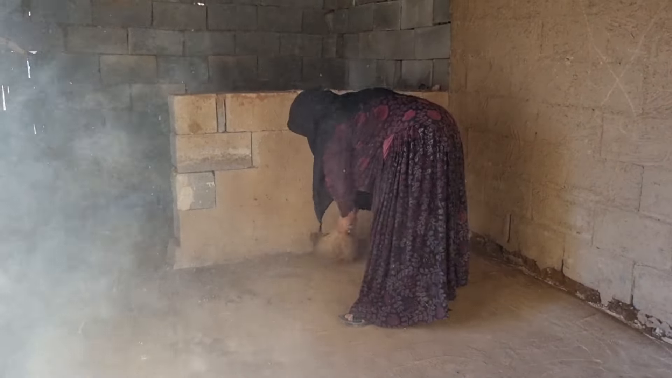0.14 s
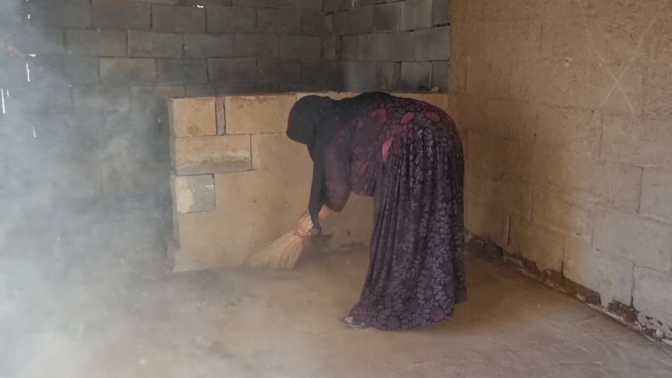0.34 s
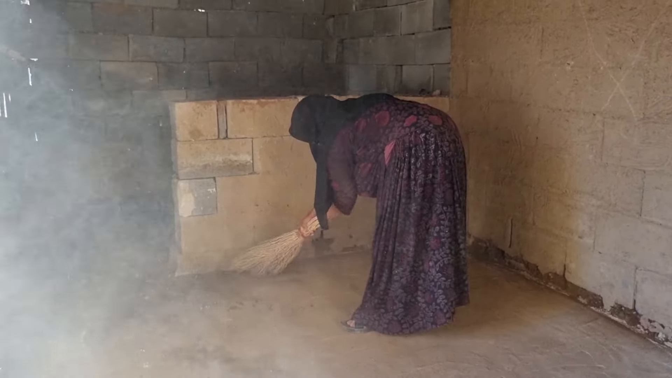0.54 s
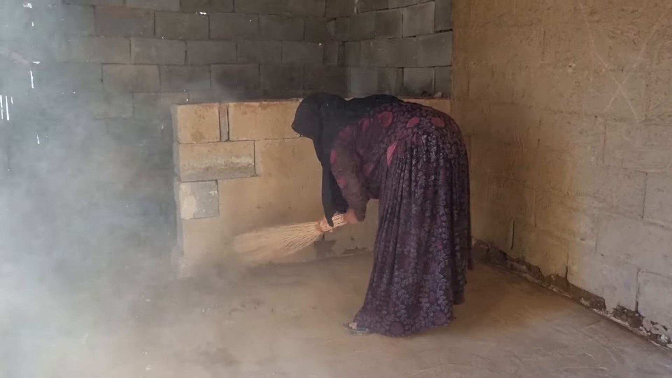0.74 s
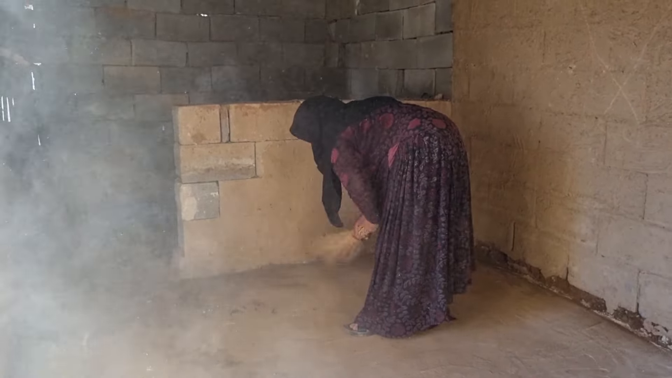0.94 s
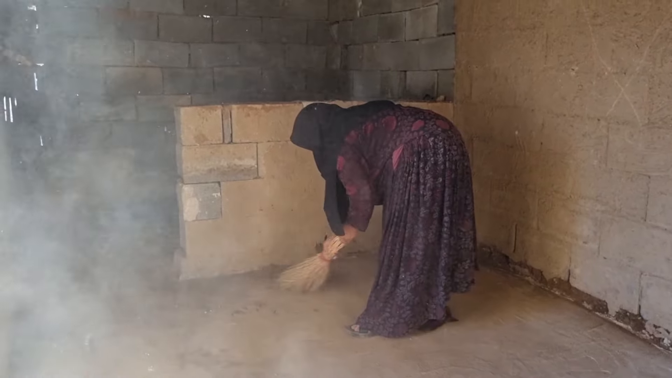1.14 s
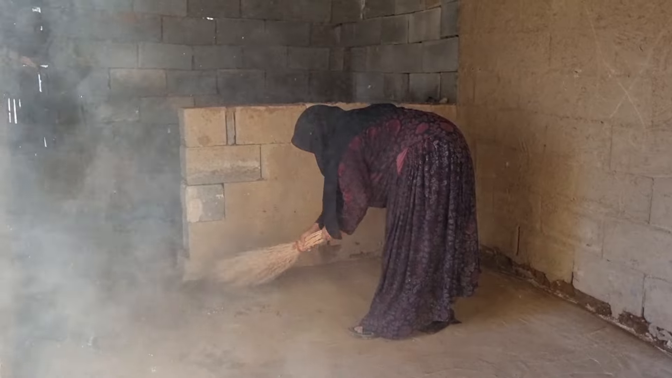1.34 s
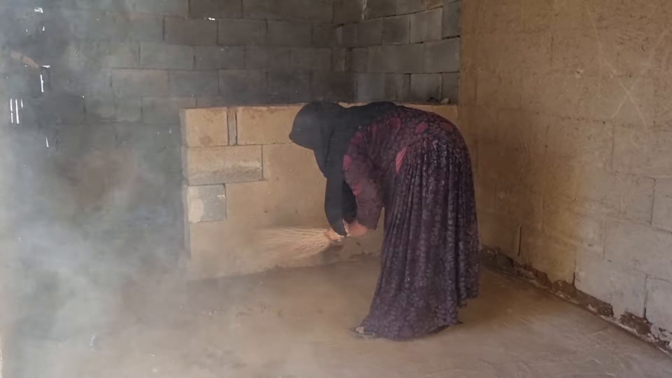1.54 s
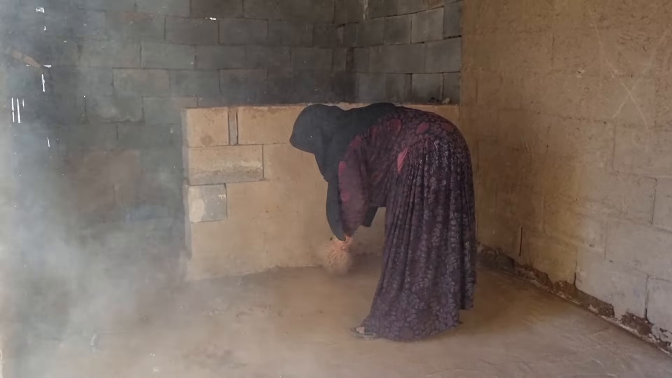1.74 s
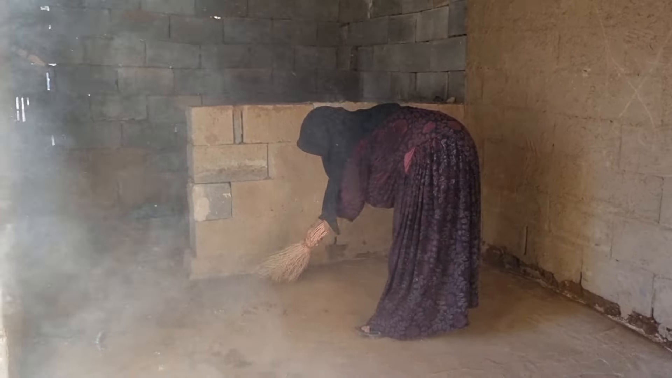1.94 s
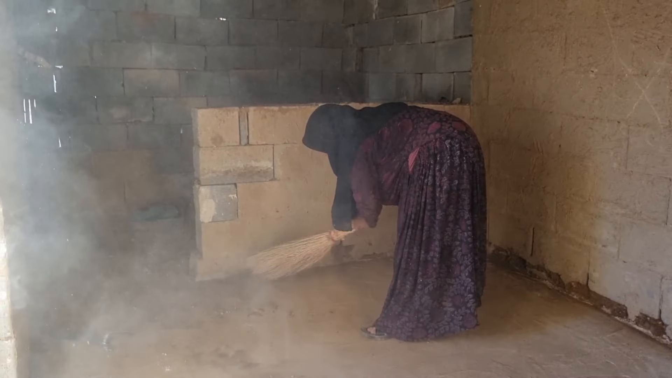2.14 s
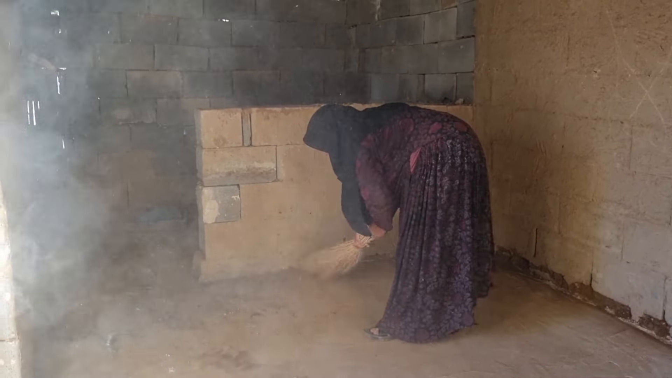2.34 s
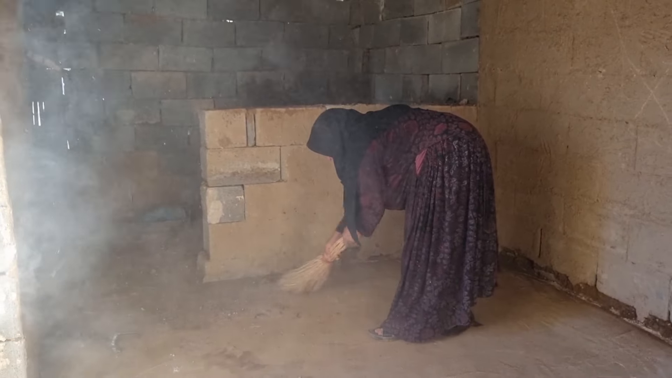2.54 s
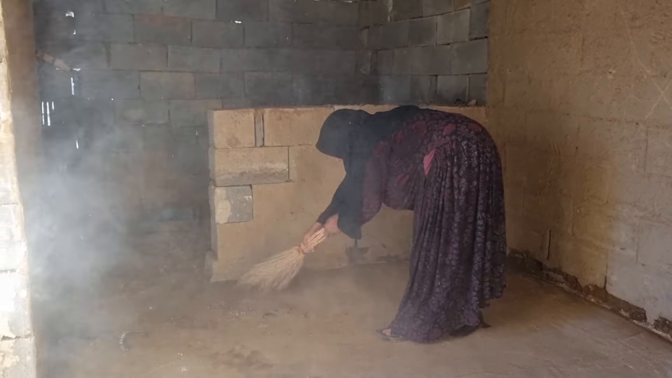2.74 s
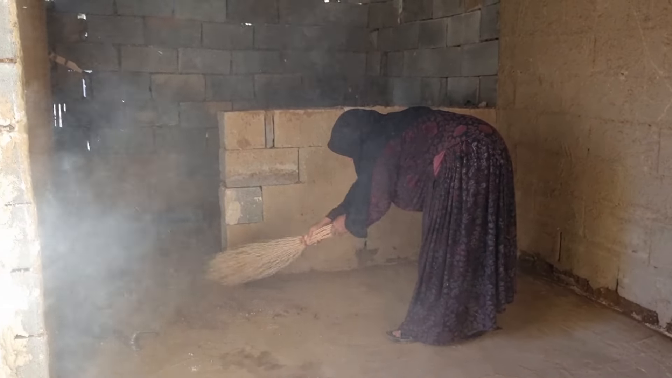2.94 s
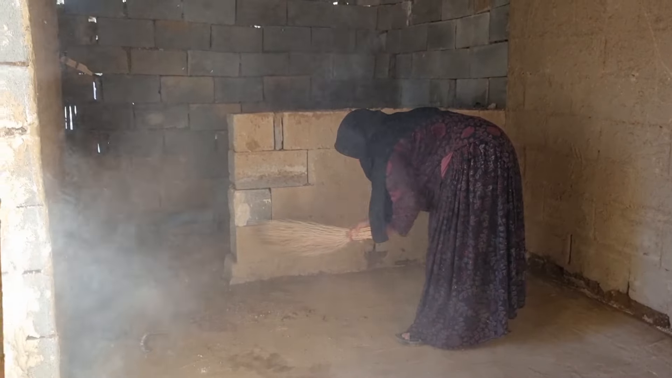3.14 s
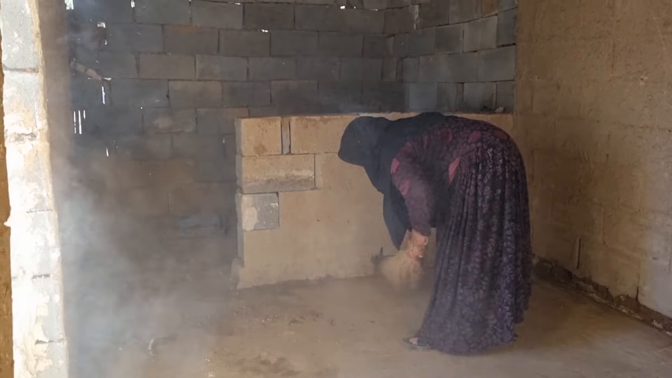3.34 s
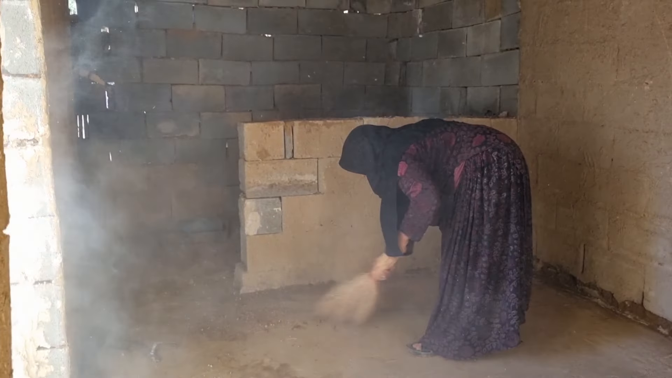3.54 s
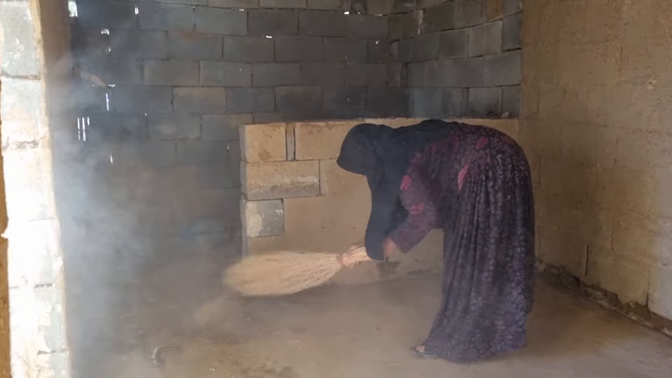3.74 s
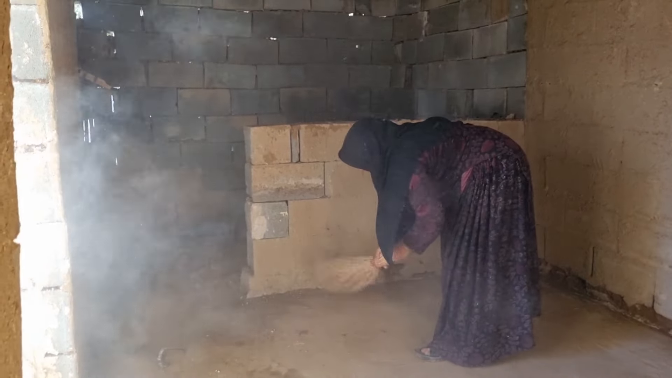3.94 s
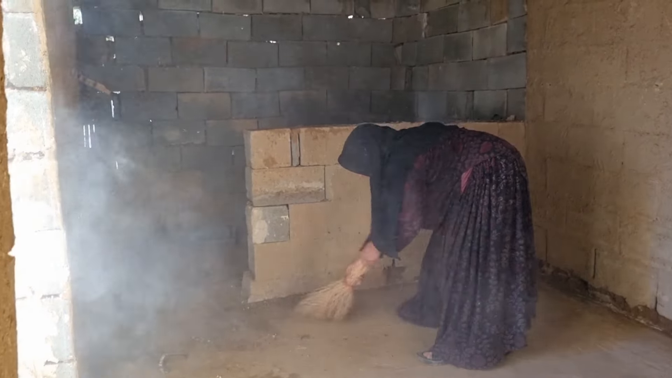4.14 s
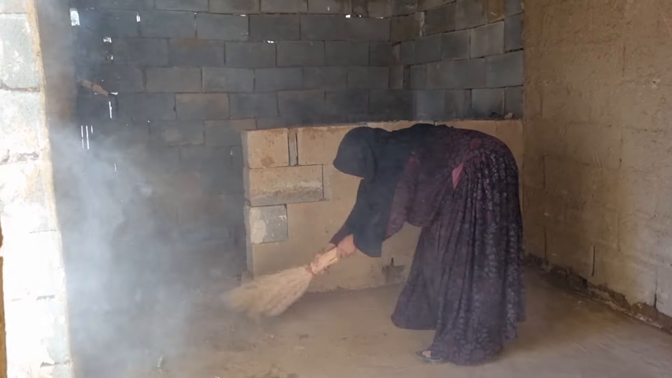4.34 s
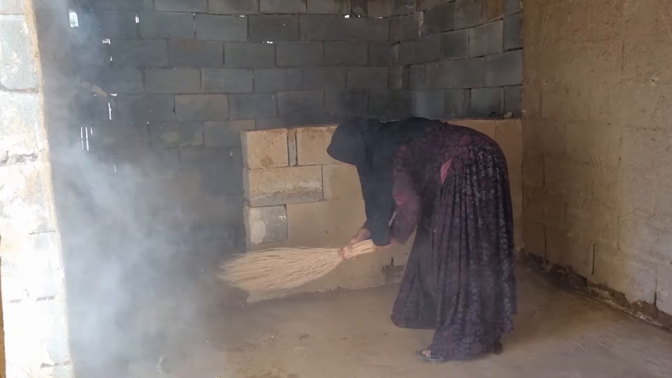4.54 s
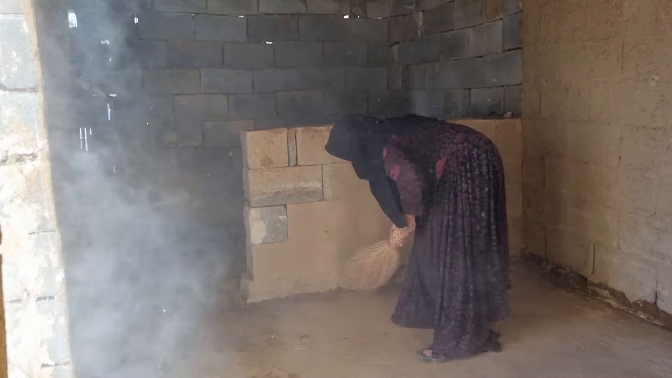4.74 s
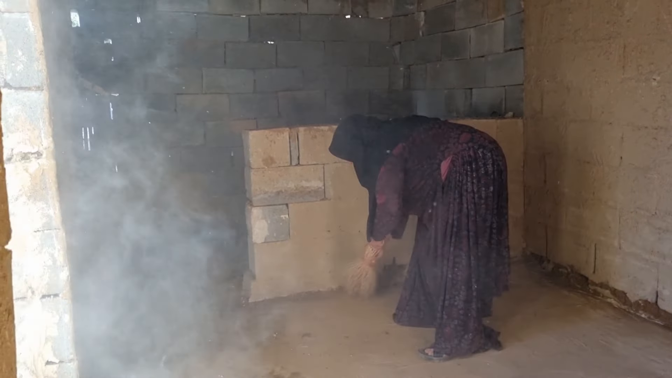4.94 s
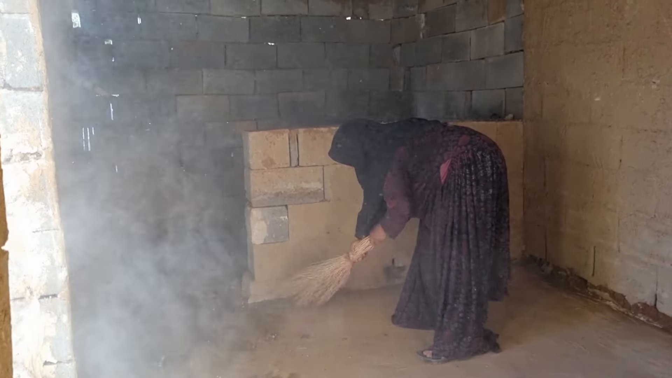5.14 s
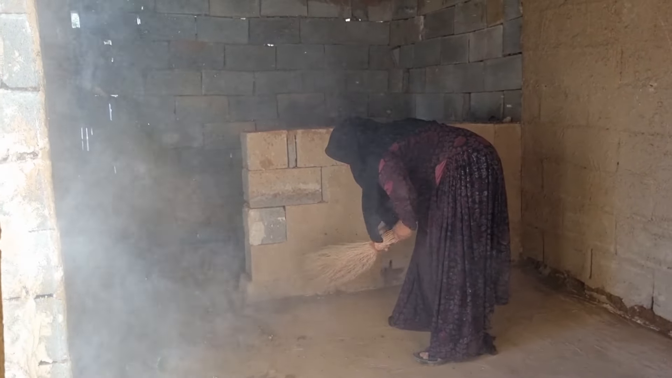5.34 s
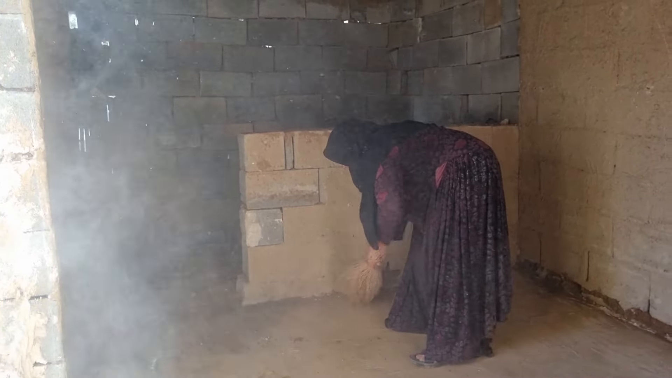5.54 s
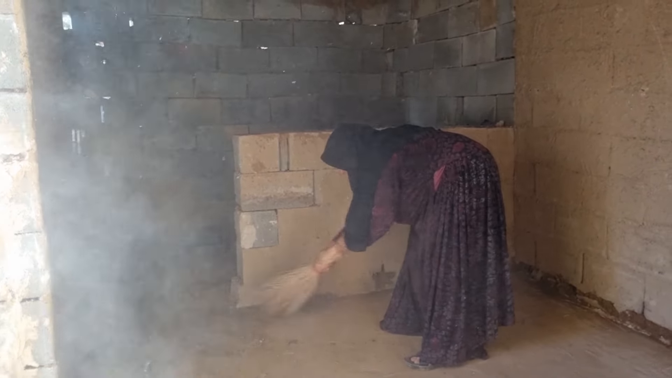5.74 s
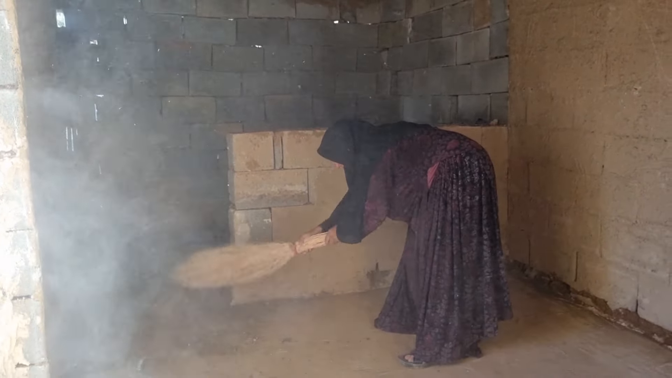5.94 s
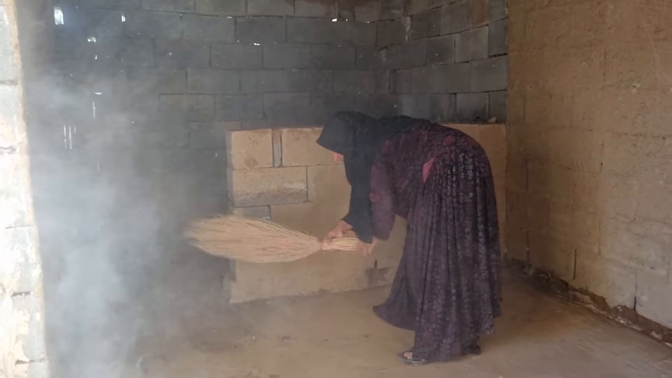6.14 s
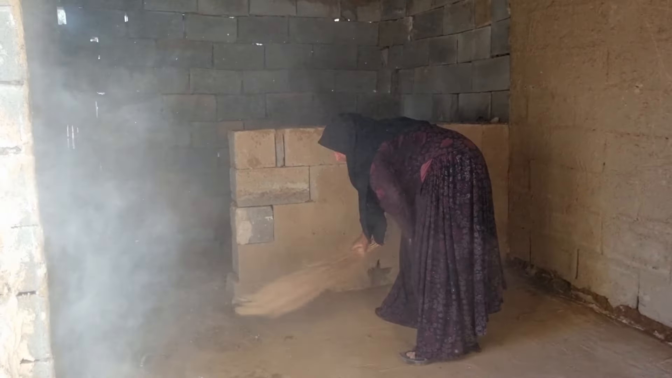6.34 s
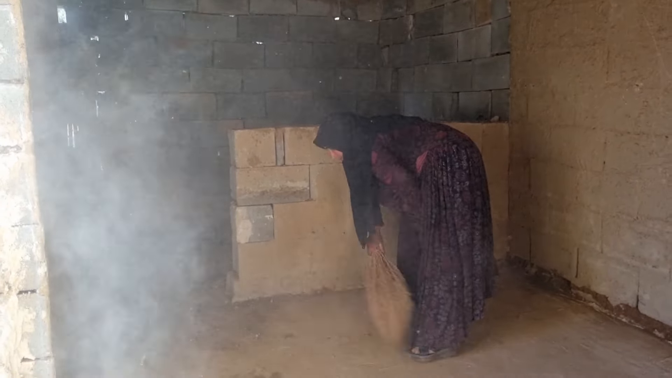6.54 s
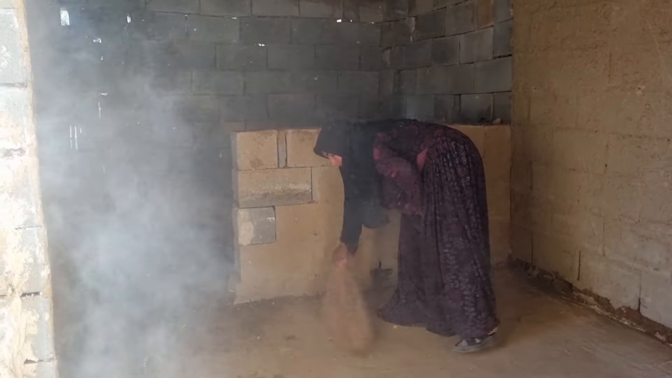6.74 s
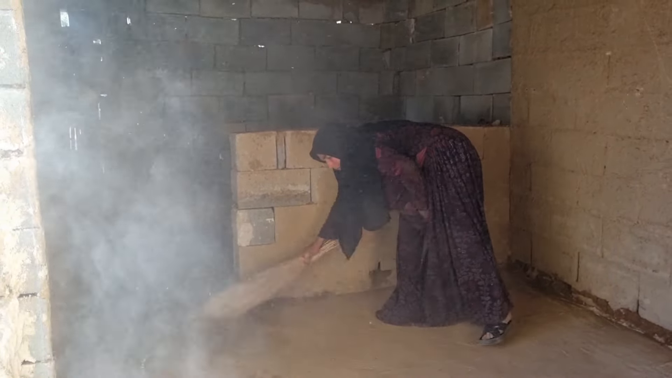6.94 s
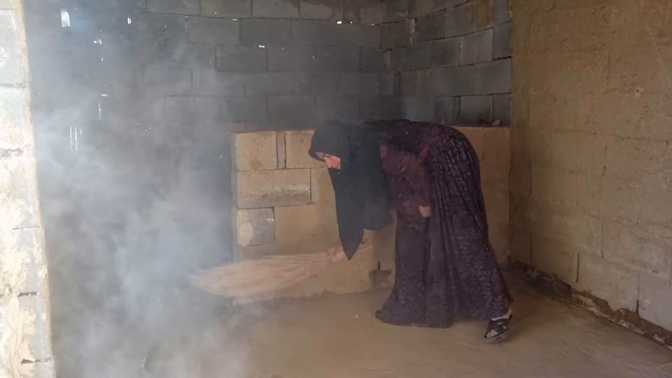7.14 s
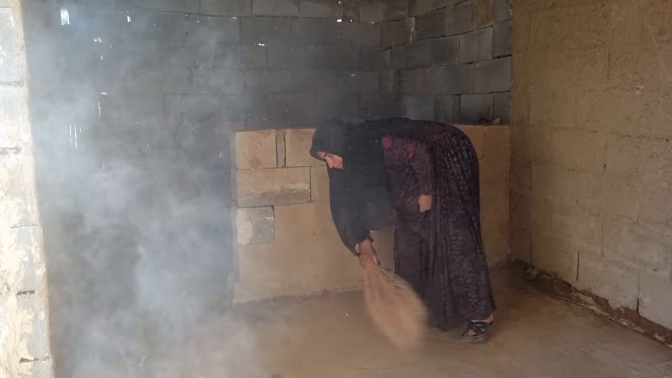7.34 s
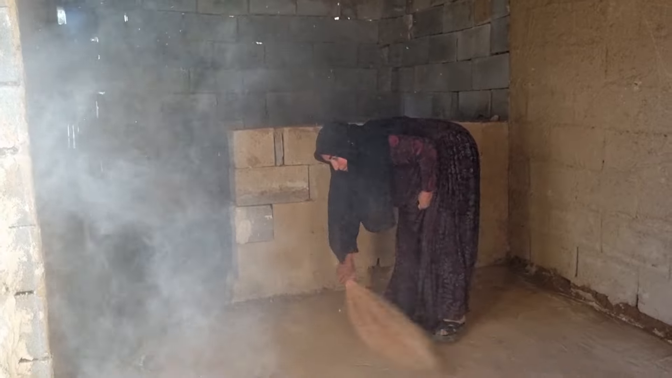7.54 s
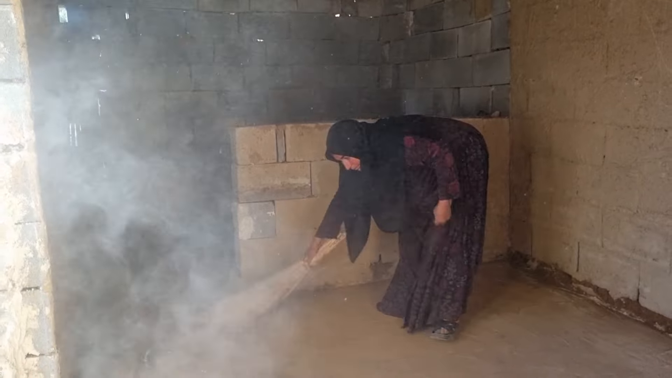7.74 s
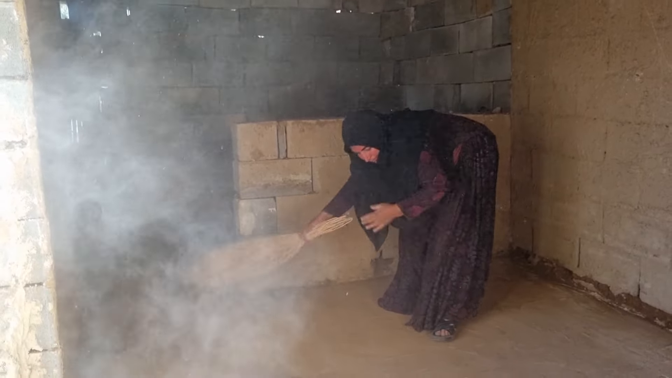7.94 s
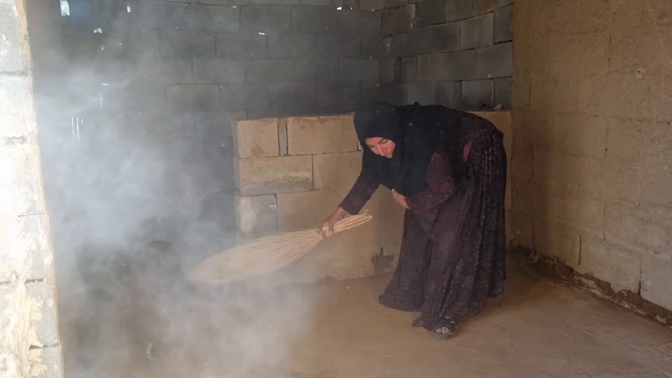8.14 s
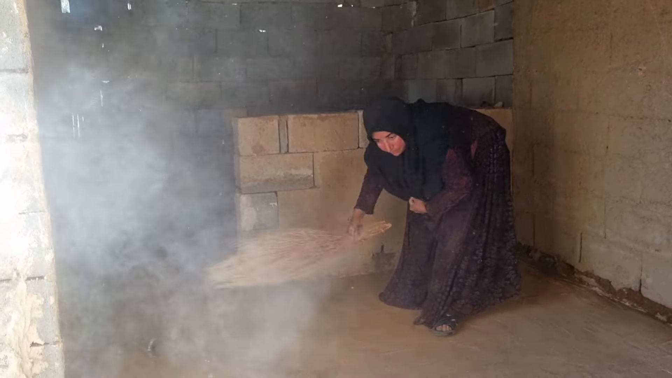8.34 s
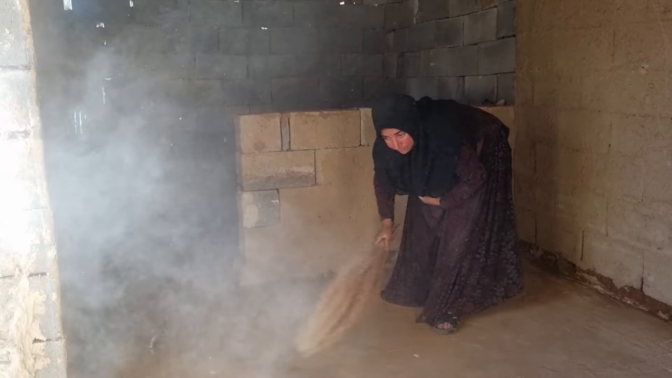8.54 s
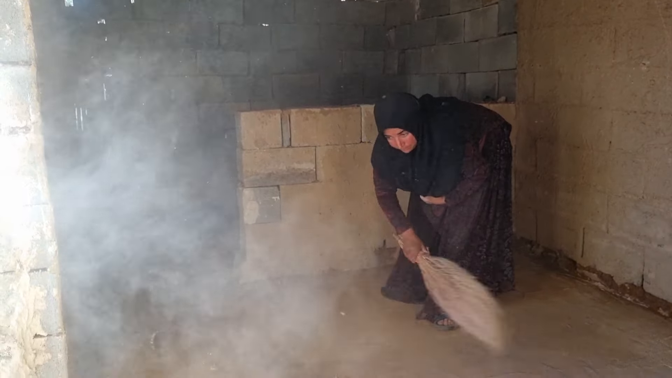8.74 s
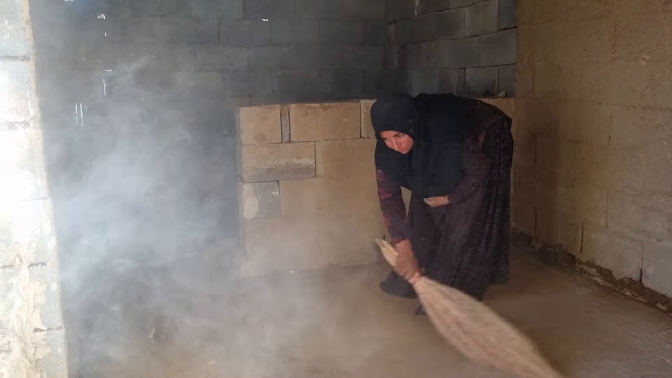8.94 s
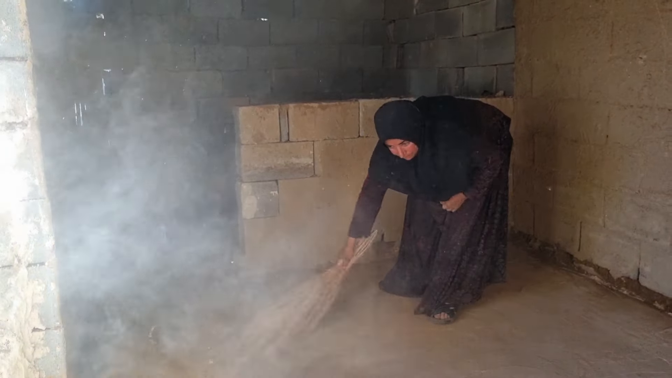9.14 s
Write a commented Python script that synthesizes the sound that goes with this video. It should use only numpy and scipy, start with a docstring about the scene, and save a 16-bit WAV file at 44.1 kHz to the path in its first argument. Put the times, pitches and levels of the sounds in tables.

```python
"""In a bare masonry room, a short straw broom sweeps a dusty floor a few steps away.
Each stroke is a swish of many stalks slipping over grit, often followed by a lighter drag back.
Between strokes the straw rustles and snaps, with soft scuffs, thuds and a brief hollow, breathy rustle.
Something knocks dully once, close by, and a far rooster crows over the low rumble of the room."""
import sys
import numpy as np
from scipy import signal
from scipy.fft import rfft, irfft, next_fast_len
from scipy.io import wavfile

SR = 44100
rng = np.random.default_rng(int(sys.argv[2]) if len(sys.argv) > 2 else 0)


def pcm_store(signal):
    """Save signal as 16-bit PCM."""
    levels = np.round(np.clip(np.atleast_2d(signal), -1, 1) * 32767)
    wavfile.write(sys.argv[1], SR, levels.astype(np.int16).T)


N = 409235

# Levels in dB are relative: each function sets its own loudness on top of them.
# A ring time (t60) is how long a sound takes to fade by 60 dB.

# How alike left and right sound. Each row: frequency in Hz, likeness (capped at 0.99, almost the same).
STEREO_LIKENESS = [(30, 2.6), (100, 0.7), (280, .95), (500, 0.5), (1000, 0), (2000, -0.37), (15000, 0)]
# Which side is louder. Each row: frequency in Hz, left minus right in dB.
STEREO_BALANCE = [(40, 5), (250, 5), (500, 4), (1000, -0.5), (4000, -5), (8000, -4), (13000, -4)]

# The tone of each noise, from bass to treble. Each row: frequency in Hz, level in dB.
RUMBLE_TONE = [(25, -13), (45, -7.5), (65, -2), (95, -1.5), (170, -19.5), (400, -29), (750, -36),
               (1600, -32), (2500, -27.5), (4500, -23), (7500, -21), (9800, -35.5), (15000, -25)]  # the air in the room
SCUFF_TONE = [(250, -2), (400, -7.5), (600, 1), (850, -1.5), (1150, 2), (1700, -10.5), (2800, -3.5)]  # a hollow, breathy hiss
TIP_TONE = [(3500, -16), (5000, -7), (6300, -5), (7500, 1), (8200, -3), (8800, -8.5), (10800, -9.5),
            (12800, -3.5), (15800, -5.5)]  # straw tips hissing
STALK_TONE = [(1200, -32), (1650, -4.5), (2000, -4.5), (2300, -2), (3000, -3), (4300, -2), (5400, -7.5),
              (7000, -13.5)]  # stalks rasping
SCRAPE_TONE = [(200, -25), (380, -8.5), (600, -2.5), (850, -3.5), (1300, 0), (1800, -11), (2800, 1.5)]  # the whole bundle scraping
RUB_TONE = [(55, 6), (90, -2), (130, 8.5), (170, -0.5), (240, 2.5), (320, -1), (400, 0.5), (470, -10),
            (750, -16)]  # a dull rub
RUSTLE_TONE = [(170, 1), (330, -7), (600, -10.5), (850, -11.5), (1500, -7.5), (2400, 0), (3300, -2.5),
               (4500, -1.5), (6000, -6.5), (7700, -5.5), (9200, -22), (11000, -16), (15000, -11.5)]  # loose stalks rubbing each other
TICK_TONE = [(1900, -0.5), (2400, -12.5), (8000, 12.5), (9500, -6), (15800, -2)]  # stalks springing free

# The parts of the rooster's call. Each row: start in seconds, length in seconds, level in dB.
CROW_PARTS = [(1.29, 0.47, -72), (1.63, .17, -68.5), (2.022, .35, -69)]
# A knock and its two rebounds. Each row: start in seconds, level in dB.
KNOCK_HITS = [(3.7658, -15.5), (3.7855, -17.5), (3.7969, -20)]
# The notes of the knocked thing. Each row: pitch in Hz, level in dB, ring time in seconds.
KNOCK_NOTES = [(108, -17, 0.065), (196, -26, 0.12), (265, -21, .19), (301, -4.5, 0.034), (338, -13.5, 0.26),
               (372.6, -6.5, 0.14), (507, -41, 0.1), (581, -25.5, 0.23), (720, -30, 0.11),
               (1070, -19.5, 0.021), (1380, -20, 0.018), (1696, -23.5, 0.043)]
# Broom and feet bumping the floor. Each row: start in seconds, level in dB, pitch in Hz.
FLOOR_THUDS = [(1.145, -31.5, 84.4), (1.157, -47, 150), (3.718, -34, 257), (4.096, -35.5, 203),
               (4.124, -30.5, 79.5), (6.782, -40, 169), (6.86, -48, 95), (7.713, -39.5, 90),
               (7.765, -42, 122), (9.24, -39, 262)]
# Soft scuffs and a brief hollow, breathy rustle.
# Each row: start, rise and fall in seconds, then hiss and rub levels in dB.
SOFT_SCUFFS = [(1.9, 0.051, 0.057, -70, -57), (3.155, 0.018, .11, -61, -54), (4.355, .025, 0.19, -51, -57),
               (7.03, 0.052, 0.46, -69, -62), (7.31, .05, 0.15, -53, -55), (7.65, 0.068, 0.055, -43, -46),
               (7.955, 0.065, 0.21, -57, -67), (9.202, 0.042, 0.11, -48.5, -52)]
# Stalks snapping against the floor. Each row: start in seconds, level in dB, main pitch in Hz,
# level of that pitch in dB, level of the highest treble in dB, ring time in seconds.
STRAW_SNAPS = [(0.1004,-40,7800,10,-10,0.11), (0.979,-36.5,7400,-3,-8,0.27), (1.617,-42,7800,-3,-4,0.14),
               (1.666,-41.5,2120,8,-12,0.07), (3.1632,-41.5,2770,10,-25,0.04), (3.215,-44,3270,21,-25,0.3),
               (3.31,-43,3250,27,-25,0.17), (3.712,-20.5,6000,2.5,-1.5,0.097), (3.809,-31.5,2900,0,-9,0.05),
               (3.8925,-27.5,6060,1,-3,0.092), (4.0223,-30,2306,2,-12,0.099),
               (4.2913,-22.5,2180,-3,-14,0.11), (4.318,-33.5,2330,18,-20,.33), (4.5,-42,2330,17,-22,.1),
               (4.594,-40,5670,-13,-12,0.09), (4.7636,-35.5,2270,10,-27,0.051), (6,-30.5,7250,12,-29,0.055),
               (6.131,-37,2460,6,-16,0.16), (6.146,-36,5770,-2,-11,0.17), (7.704,-20,2230,15,-3,0.025),
               (7.9565,-40.5,6040,-8,-40,0.56), (8.5054,-42.5,7200,-4,-21,0.078),
               (8.8336,-42,7600,8.5,-19,0.062), (9.2385,-20,1840,0,-27,0.097)]
# The notes of the hollow stalks. Each row: pitch in Hz, level in dB, ring time in seconds.
STALK_NOTES = [(1750, -8, 0.016), (2350, 1.5, 0.009), (2660, 6, 0.021), (3230, 3, 0.031), (3900, 3, 0.038),
               (4860, -0.5, 0.051), (5170, -6, 0.018), (5830, -12, 0.015), (7020, 10, 0.0099),
               (7940, -9, 0.012)]
# The rustle as the broom is carried and turned. Each row: time in seconds, level in dB.
RUSTLE_LEVELS = [(0, -82), (.45, -61), (1.58, -66.5), (1.7, -60.5), (3.05, -58), (3.3, -56), (3.8, -46),
                 (3.96, -47.5), (4.42, -51), (4.68, -65), (5.9, -59.5), (6.2, -57), (6.35, -64.5),
                 (6.58, -52.5), (7.16, -62.5), (7.35, -55), (7.9, -62.5), (8.3, -64.5), (8.5, -68.5),
                 (8.68, -79)]
# Tips flicking the floor in passing. Each row: start, rise and fall in seconds, then level in dB.
TIP_FLICKS = [(.01, .015, .15, -64), (.096, .008, .08, -47), (0.969, 0.02, 0.19, -43),
              (2.15, 0.027, 0.1, -43.5), (2.335, 0.028, .08, -44), (3.03, .04, 0.13, -54),
              (3.368, 0.016, 0.17, -47), (3.62, .035, 0.054, -35.5), (4.005, 0.012, 0.18, -45),
              (4.36, .03, 0.16, -42), (4.48, .1, 0.21, -55), (4.665, 0.034, 0.1, -59.5),
              (4.749, 0.01, 0.042, -45.5), (5.97, 0.013, 0.17, -47), (6.29, 0.013, 0.062, -59),
              (6.558, .015, 0.28, -43), (6.655, 0.031, 0.12, -36), (7.07, 0.017, 0.062, -54),
              (7.443, 0.053, 0.18, -38.5), (7.8, .04, .22, -66), (8.1, 0.027, 0.067, -52),
              (8.27, 0.017, .08, -54), (8.435, 0.023, 0.088, -52), (8.495, .015, 0.038, -52)]
# Firm pushes and lighter drags of the broom. Each row: start, rise, hold and fall in seconds,
# then the levels in dB of tip hiss, stalk rasp, bundle scrape and dull rub.
BROOM_STROKES = [ (0.094, 0.091, 0.068, 0.19, -33.5, -42, -53, -63.5),
                 (0.37, 0.31, .03, 0.1, -40, -49.5, -58.5, -68),
                 (1.014, 0.12, 0.035, 0.22, -31, -41, -50.5, -54.5),
                 (1.236, .10, 0.038, 0.18, -41, -57.5, -68, -67.5),
                 (1.741, 0.1, 0.0098, 0.28, -32, -41, -52.5, -67),
                 (1.944, 0.17, 0.034, 0.073, -41, -54, -74, -88),
                 (2.291, 0.087, 0.081, .15, -43, -52.5, -62, -65.5),
                 (2.409, 0.13, 0.017, 0.22, -31.5, -40.5, -51.5, -57),
                 (2.676, 0.24, 0.0091, 0.1, -39.5, -55, -60, -62.5),
                 (3.433, 0.12, 0.024, 0.12, -25.5, -36, -47, -53),
                 (4.05, 0.11, 0.013, 0.18, -30.5, -42, -48, -49.5),
                 (4.235, 0.12, .02, 0.15, -40.5, -45, -62, -54),
                 (4.862, 0.14, 0.085, 0.18, -37, -46, -54.5, -62),
                 (5.077, 0.12, 0.033, 0.09, -38.5, -53, -66, -68),
                 (5.383, 0.056, 0.057, 0.069, -43, -51.5, -63.5, -69),
                 (5.51, 0.2, 0.013, 0.19, -33.5, -42.5, -48, -53.5),
                 (5.728, .10, 0.036, 0.085, -34.5, -48, -70, -61),
                 (6.643, 0.13, 0.064, 0.14, -29, -34.5, -45.5, -46),
                 (7.462, 0.15, .06, 0.19, -28, -36, -47.5, -56),
                 (8.909, 0.13, 0.083, 0.56, -27, -39, -51, -62.5), ]


def from_db(db):
    """Turn decibels into a number to multiply a sound by."""
    return 10 ** (np.asarray(db) / 20)


def together_db(first_db, second_db):
    """The level of two unrelated sounds heard at once."""
    return 20 * np.log10(np.hypot(from_db(first_db), from_db(second_db)))


def rms_one(x):
    """Scale a sound so that its average strength (rms) is 1."""
    return x / np.sqrt(np.mean(x ** 2) + 1e-20)


def at_bins(points, size):
    """Read a frequency table at every frequency of an FFT."""
    hz, value = np.transpose(points)
    return np.interp(np.log(np.fft.rfftfreq(size, 1 / SR) + 1), np.log(hz), value)


def colour(x, tone):
    """Shape a noise with a tone table, at strength 1; beyond the table's ends it drops by 30 dB."""
    size = next_fast_len(N)
    (low, low_db), (high, high_db) = tone[0], tone[-1]
    curve = [(low / 2, low_db - 30), *tone, (high * 2, high_db - 30)]
    shaped = rfft(x, size) * from_db(at_bins(curve, size))
    return rms_one(irfft(shaped, size)[..., :N])


def butter(x, hz, kind, order=2):
    """Keep the lows, the highs or a band of a sound."""
    return signal.sosfilt(signal.butter(order, hz, kind, fs=SR, output="sos"), x + 1e-18)


def drift(rate):
    """A smooth random wander of about 1 either way; a higher rate wanders faster."""
    pole = np.exp(-80 * np.pi * rate / SR)
    noise = rng.standard_normal(N // 40 + 2002)
    slow = signal.lfilter([1], [1, -2 * pole, pole * pole], noise)[2000:]
    return np.interp(np.arange(N) / 40, np.arange(len(slow)), rms_one(slow))


def ring(clicks, hz, t60):
    """Each click starts a pure note that fades away."""
    decay, angle = from_db(-60 / (t60 * SR)), 2 * np.pi * hz / SR
    return signal.lfilter([0, np.sin(angle)], [1, -2 * decay * np.cos(angle), decay ** 2], clicks + 1e-18)


def diffuse(count):
    """Stereo noise arriving from all sides: alike left and right in the bass, unrelated in the treble."""
    size = next_fast_len(count)
    mid, side = rfft(rng.standard_normal((2, size)))
    alike = np.clip(at_bins(STEREO_LIKENESS, size), -.99, .99)
    sign = np.array([[1], [-1]])
    pair = np.sqrt(1 + alike) * mid + sign * np.sqrt(1 - alike) * side
    balance = from_db(sign * at_bins(STEREO_BALANCE, size) / 2)
    return rms_one(irfft(pair * balance, size)[:, :count])


def room(x, echo_db, t60=0.18):
    """The direct sound, then a blur of echoes from the bare walls."""
    t = np.arange(SR // 2) / SR
    tail = diffuse(len(t)) * from_db(-60 * t / t60) * (t > .003)
    tail = rms_one(tail) / np.sqrt(len(t))
    return x + from_db(echo_db) * signal.fftconvolve(x[None], tail, axes=1)[:, :N]


def slips(per_s, spread_db):
    """Random clicks of uneven size, as when stalks catch on grit and let go."""
    sizes = from_db(spread_db * np.minimum(rng.exponential(1, N), 5)) * rng.choice([-1, 1], N)
    return sizes * (rng.random(N) < per_s / SR)


def friction(level_db, tone, per_s, grain_db, flutter_db):
    """Countless slips merge into a hiss; the larger ones stand out as grain and echo in the room."""
    gain = from_db(level_db + flutter_db * drift(29))
    grain = gain * colour(slips(per_s, spread_db=1), tone)
    return gain * colour(diffuse(N), tone) + from_db(grain_db) * room(grain, echo_db=2)


def swell(start, rise, hold, fall, fall_power, rise_power=2.3, depth_db=21.5):
    """The loudness of one stroke or scuff: it grows, holds and dies away."""
    gain = np.zeros(N)
    first = max(int((start - rise - .1) * SR), 0)
    last = min(int((start + rise + hold + 4 * fall) * SR), N)
    t = np.arange(first, last) / SR - start
    early = np.maximum(1 - t / rise, 0)
    late = np.maximum(t - rise - hold, 0) / fall
    drop_db = depth_db * (early ** rise_power + late ** fall_power)
    gain[first:last] = from_db(-np.minimum(drop_db, 120))
    return gain


def room_rumble(level_db=-59.5):
    """The air of the room: a low, steady noise from all around."""
    return from_db(level_db) * colour(diffuse(N), RUMBLE_TONE)


def rooster(top_hz=994, top_s=1.2, sag_hz_per_s=80, waver=0.0235, fading_db=3):
    """Only the strongest tone of the hoarse crow carries this far; it sags and fades in and out."""
    t = np.arange(N) / SR
    hz = top_hz - sag_hz_per_s * (t - top_s)
    phase = 2 * np.pi * np.cumsum(hz * (1 + waver * drift(98))) / SR
    gain = sum(from_db(db) * np.sin(np.pi * np.clip((t - start) / length, 0, 1))
               for start, length, db in CROW_PARTS)
    return room(gain * from_db(fading_db * drift(15)) * np.sin(phase), echo_db=5)


def knock():
    """A blow and two softer, duller rebounds ring the same low notes."""
    blow, *rebounds = [signal.unit_impulse(N, round(start * SR)) * from_db(db) for start, db in KNOCK_HITS]
    clicks = blow + butter(sum(rebounds), 650, "low", order=1)
    body = sum(ring(clicks * from_db(db), hz, t60) for hz, db, t60 in KNOCK_NOTES)
    return room(butter(body, [85, 2500], "band"), echo_db=-13)


def thuds(t60=0.092):
    """Broom and feet land softly and heavily: each bump is a short, low note."""
    bumps = sum(ring(signal.unit_impulse(N, round(start * SR)) * from_db(db), hz, t60)
                for start, db, hz in FLOOR_THUDS)
    return room(butter(bumps, [55, 900], "band"), echo_db=-13)


def scuffs():
    """Soft scuffs and a brief hollow, breathy rustle: a grainy hiss and a dull rub swell together."""
    hiss_gain, rub_gain = np.zeros((2, N))
    for start, rise, fall, hiss_db, rub_db in SOFT_SCUFFS:
        shape = swell(start, rise, 0, fall, fall_power=1.12)
        hiss_gain += from_db(hiss_db) * shape
        rub_gain += from_db(rub_db) * shape
    rub = colour(room(slips(900, spread_db=4.5), echo_db=-2), RUB_TONE)
    hiss = friction(0, SCUFF_TONE, per_s=500, grain_db=-4.5, flutter_db=1)
    return hiss_gain * hiss + rub_gain * rub


def snaps(note_width=0.078, detune=0.086):
    """A tuft lands: a burst of tiny cracks rings all its stalks a little and one of them most."""
    out, t = np.zeros(N + SR), np.arange(SR // 3) / SR
    for start, level_db, hz, note_db, treble_db, t60 in STRAW_SNAPS:
        burst = rng.standard_normal(len(t)) * from_db(-60 * t / t60)
        treble = from_db(treble_db + 5) * butter(burst, 13500, "high")
        crack = butter(burst, [3500, 8000], "band", order=3) + treble
        stalks = sum(from_db(db + 2 * rng.normal())
                     * ring(burst, stalk_hz * np.exp(detune * rng.normal()), stalk_t60)
                     for stalk_hz, db, stalk_t60 in STALK_NOTES)
        note = butter(burst, hz * np.exp([-note_width / 2, note_width / 2]), "band", order=1)
        tuft = crack + from_db(-3) * np.std(crack) * rms_one(stalks) + from_db(note_db + 8) * note
        tuft /= np.std(tuft[:SR // 100])  # the first 10 ms set the loudness
        at = round(start * SR)
        out[at:at + len(t)] += from_db(level_db - 12) * tuft
    return room(butter(out[:N], 1200, "high"), echo_db=2.5) * from_db([[-1.2], [1.2]])  # to the right


def crackle(level_db):
    """Bent stalks spring free, each with a tick of its own."""
    ticks = colour(slips(130, spread_db=-0.5), TICK_TONE)
    return room(from_db(level_db - 9) * ticks, echo_db=-4) * from_db([[-1.5], [1.5]])


def hollow_stalks(low_hz=2050, high_hz=7900, count=26, db_per_octave=-2.5, wander_db=6):
    """Slips ring stalks of many lengths; as the bundle rolls, now one stands out, now another."""
    out = np.zeros(N)
    for hz in np.geomspace(low_hz, high_hz, count):
        gain = from_db(db_per_octave * np.log2(hz / low_hz) + wander_db * np.clip(drift(2.5), -2, 2))
        out += gain * ring(slips(260, spread_db=5.5), hz, t60=0.01)
    return rms_one(room(out, echo_db=3.5) * from_db([[-1.1], [1.1]]))


def near_wall(x, echo_db=-10.5, lag_s=.0032, swing_s=0.000503):
    """A wall beside the broom returns a quick echo, whose delay shifts as the arm swings."""
    now = np.arange(N)
    echoes = [np.interp(now - SR * (lag_s + swing_s * drift(0.774)), now, channel) for channel in x]
    return (x + from_db(echo_db) * np.array(echoes)) / np.hypot(1, from_db(echo_db))


def strokes_db(levels_db, lag_s, fall_stretch, fall_power):
    """The level of one part of the broom through all the strokes."""
    power = sum((from_db(db) * swell(start + lag_s, rise, hold, fall * fall_stretch, fall_power)) ** 2
                for (start, rise, hold, fall, *_), db in zip(BROOM_STROKES, levels_db))
    return 10 * np.log10(power + 1e-12)


def broom(damp_above_db=-49.5, damping=0.27):
    """Tips hiss, stalks rasp, and the pressed bundle scrapes and rubs; between strokes it rustles."""
    hiss_levels, rasp_levels, scrape_levels, rub_levels = np.transpose(BROOM_STROKES)[-4:]
    # The tips touch first; the stalks and then the bundle follow as the broom bends.
    hiss_db = strokes_db(hiss_levels, lag_s=0, fall_stretch=0.98, fall_power=0.8)
    rasp_db = strokes_db(rasp_levels, lag_s=0.0034, fall_stretch=0.86, fall_power=1.14)
    scrape_db = strokes_db(scrape_levels, lag_s=0.013, fall_stretch=0.98, fall_power=1.2)
    rub_db = strokes_db(rub_levels, lag_s=0.023, fall_stretch=1.08, fall_power=1.3)
    rustle_db = np.interp(np.arange(N) / SR, *np.transpose(RUSTLE_LEVELS))
    flicks = sum(from_db(db) * swell(start, rise, 0, fall, fall_power=1.1)
                 for start, rise, fall, db in TIP_FLICKS)
    tips_db = together_db(hiss_db, 20 * np.log10(flicks + 1e-6))
    hiss = friction(tips_db, TIP_TONE, per_s=2800, grain_db=-9.5, flutter_db=0.56)
    rasp = friction(rasp_db - 0.2, STALK_TONE, per_s=1100, grain_db=-7.5, flutter_db=1.7)
    rustle = friction(rustle_db + 1, RUSTLE_TONE, per_s=250, grain_db=-3.5, flutter_db=1.53)
    # A light touch leaves the stalks free to ring; pressing holds them back.
    stirred_db = together_db(rasp_db, rustle_db - 4)
    ringing_db = stirred_db - damping * np.maximum(stirred_db - damp_above_db, 0)
    ringing = from_db(ringing_db - 3) * hollow_stalks() + crackle(ringing_db)
    scrape = friction(scrape_db + 0.3, SCRAPE_TONE, per_s=500, grain_db=-4, flutter_db=1.7)
    rub = from_db(rub_db + 1.63) * colour(room(slips(900, spread_db=3.5), echo_db=0.5), RUB_TONE)
    return hiss + rasp + rustle + ringing + scrape + rub


def scene():
    """The rumble of the room with the broom, scuffs, small bumps and far crow on top."""
    return room_rumble() + near_wall(broom()) + scuffs() + snaps() + thuds() + knock() + rooster()


def record(dry, low_hz=50.3, high_hz=16000):
    """The microphones lose the deepest bass, and the highest treble is cut steeply."""
    thin = butter(dry, low_hz, "high")
    return signal.sosfilt(signal.ellip(12, .1, 80, high_hz, fs=SR, output="sos"), thin)


dry = scene()
out = record(dry)
pcm_store(out)
```